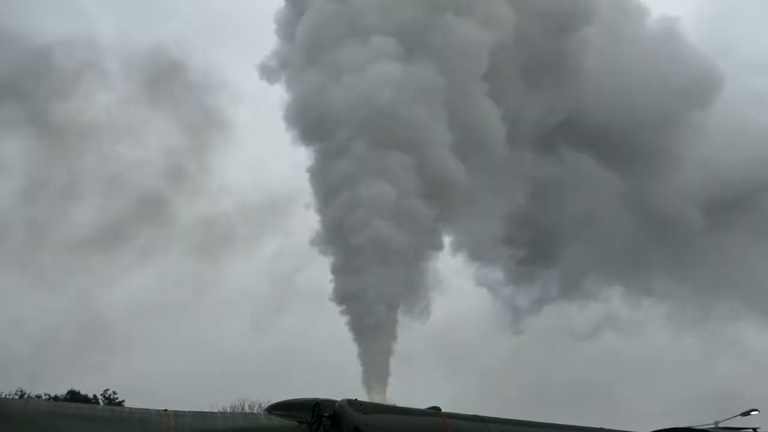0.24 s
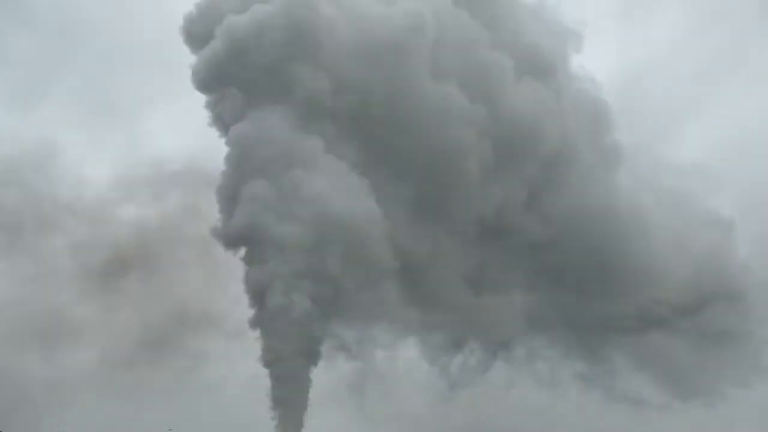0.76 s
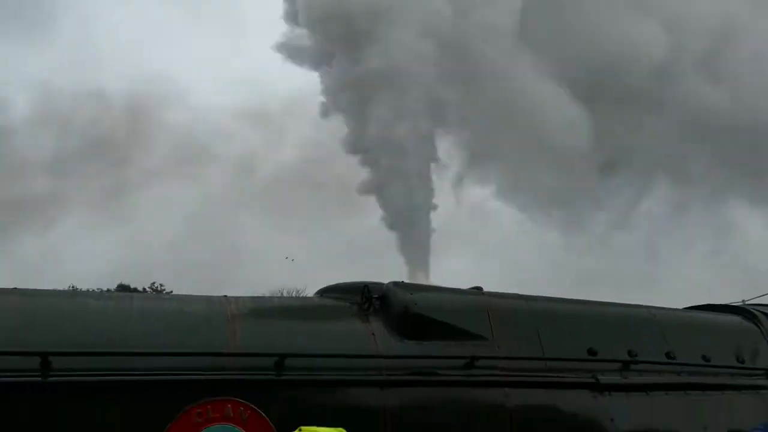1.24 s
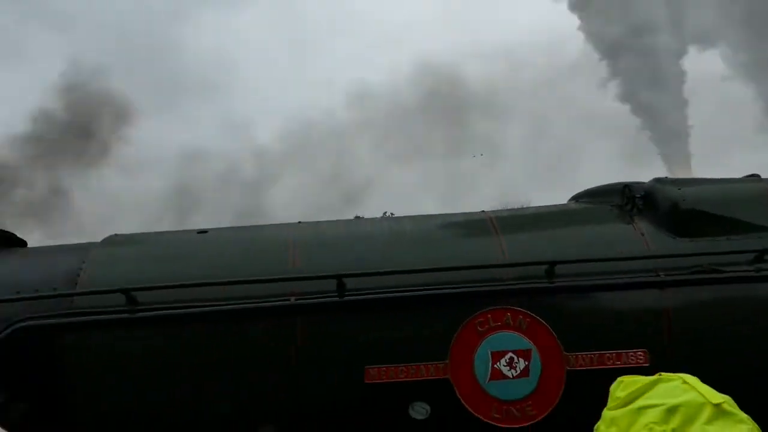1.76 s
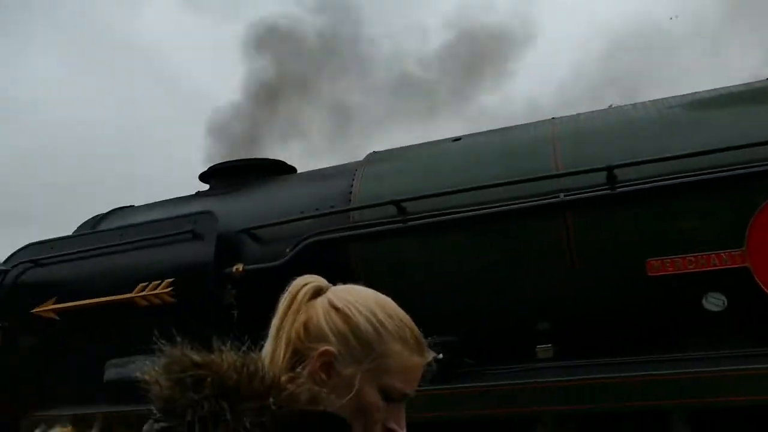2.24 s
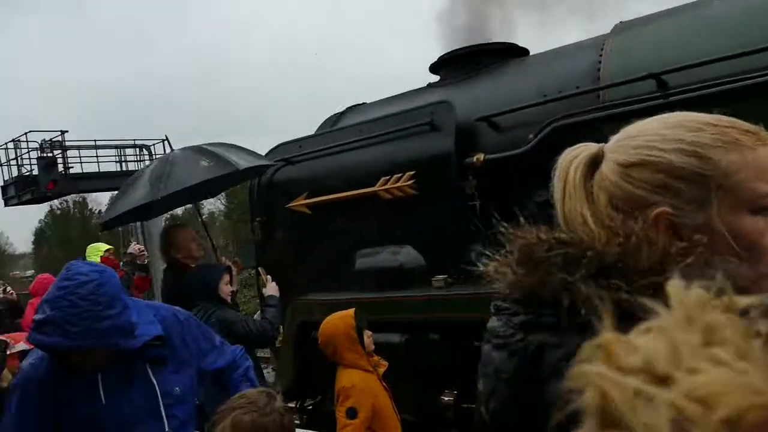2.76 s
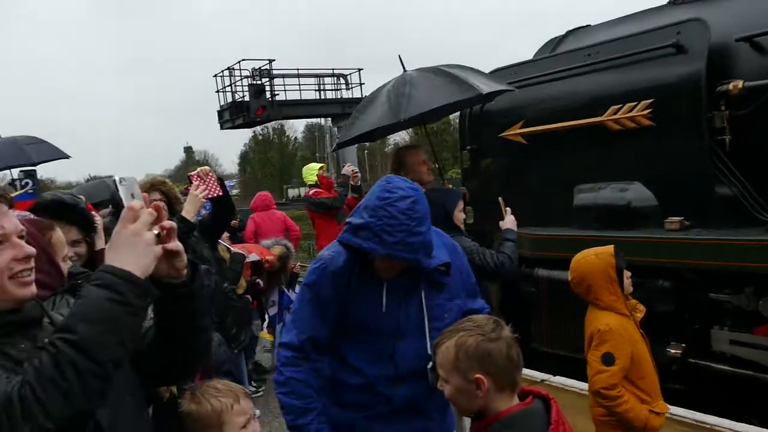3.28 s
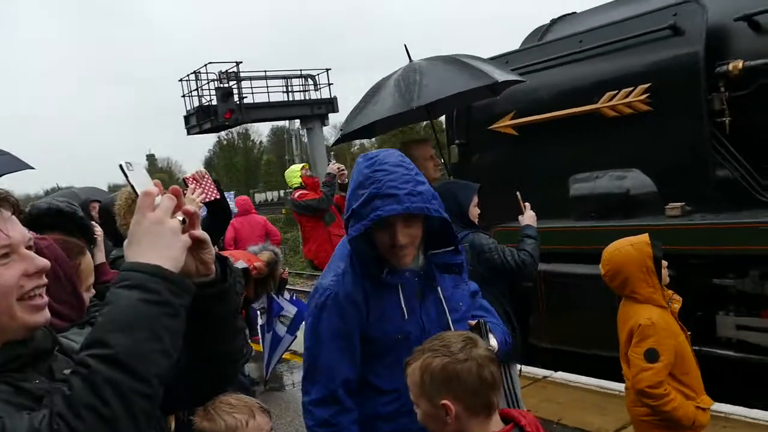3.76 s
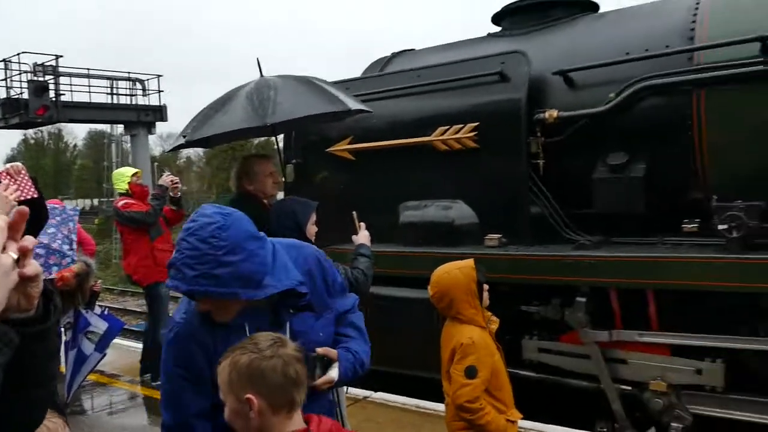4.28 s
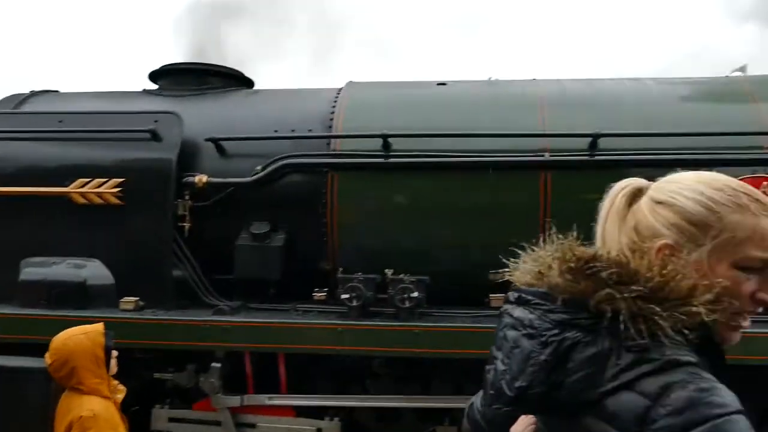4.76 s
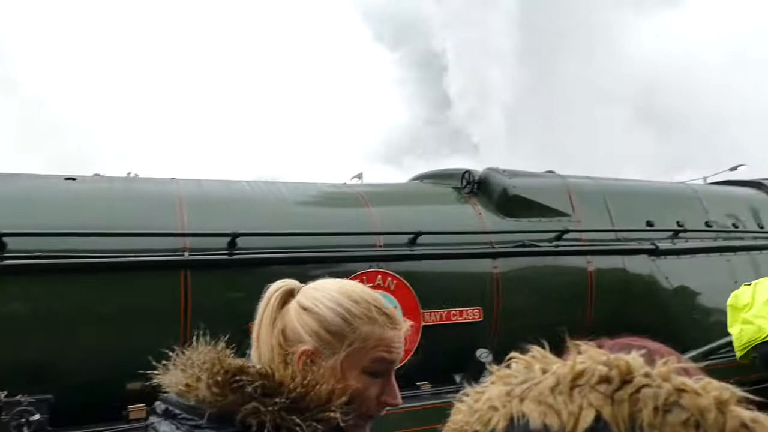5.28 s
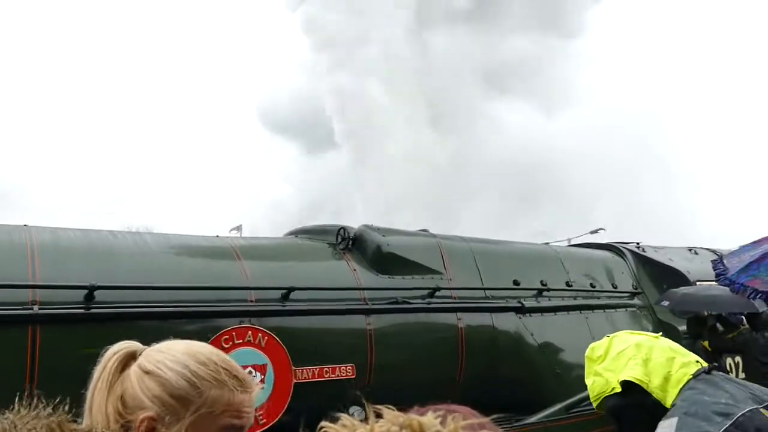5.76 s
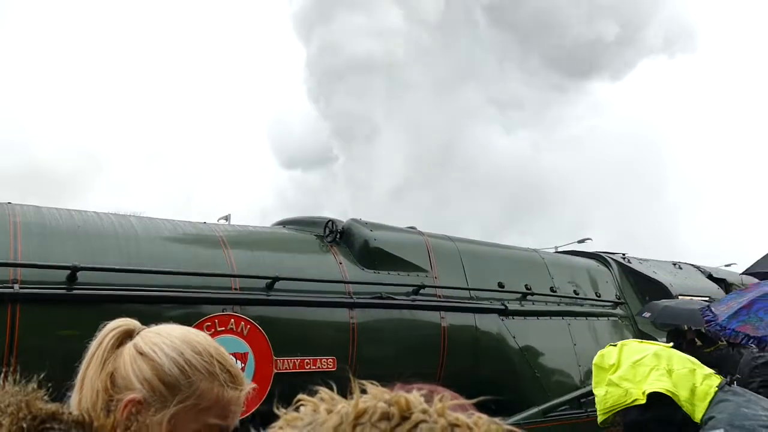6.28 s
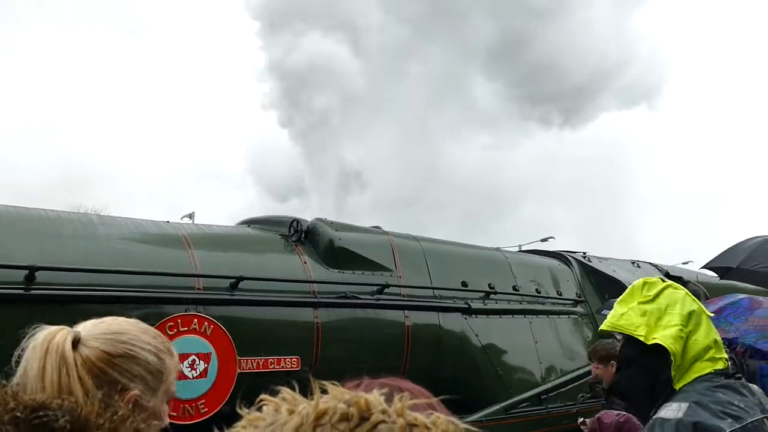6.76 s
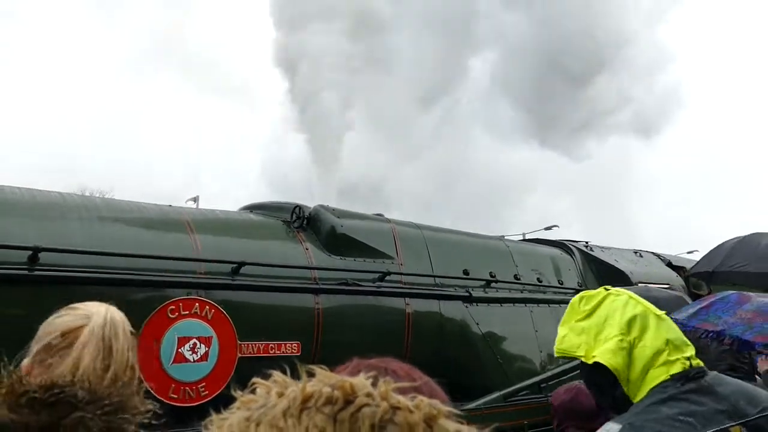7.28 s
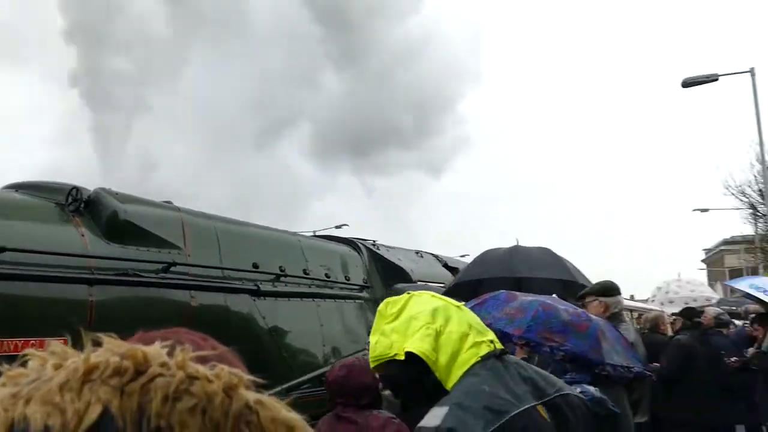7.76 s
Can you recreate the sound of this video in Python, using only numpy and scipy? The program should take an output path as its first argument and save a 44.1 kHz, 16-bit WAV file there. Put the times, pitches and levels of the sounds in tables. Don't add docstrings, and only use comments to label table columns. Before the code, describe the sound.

Continuous rushing steam jet from a locomotive boiler at an open station, unbroken from start to end, with a faint low drone beneath.

```python
import sys
import numpy as np
from scipy import signal
from scipy.io import wavfile
from scipy.ndimage import uniform_filter1d

SR = 44100
rng = np.random.default_rng(int(sys.argv[2]) if len(sys.argv) > 2 else 0)


def generate_wav(sig):
    pcm = np.round(np.clip(np.atleast_2d(sig).T, -1, 1) * 32767).astype(np.int16)
    wavfile.write(sys.argv[1], SR, pcm)


def to_linear_factor(level_db):
    exponent = np.asarray(level_db, float) / 20
    return 10 ** exponent


N = 354123
FRAME = 2048
PORT_HALF_TURN_HZ = 15500


def white_frames():
    hz, s, spectra = signal.stft(rng.standard_normal(N), SR, nperseg=FRAME, noverlap=3 * FRAME // 4)
    return np.maximum(hz, 10)[:, None], s, spectra


def sound_of(spectra):
    return signal.istft(spectra, SR, nperseg=FRAME, noverlap=3 * FRAME // 4)[1][:N]


def in_time(rows, s):
    at_s, *columns = np.transpose(rows)
    return [np.interp(s, at_s, column) for column in columns]


def at_hz(points, hz):
    point_hz, value = np.transpose(points)
    return np.interp(np.log(hz), np.log(point_hz), value)


def patches(shape, bins, frames):
    field = rng.standard_normal(shape)
    for axis, size in ((0, bins), (1, frames), (0, bins), (1, frames)):
        field = uniform_filter1d(field, size, axis=axis)
    return field / field.std()


def turbulence(shape, ripple_db, billow_db, flutter_db):
    ripple = patches(shape, bins=3, frames=30)
    ripple = ripple - uniform_filter1d(ripple, size=17, axis=0)
    billow = patches(shape, bins=90, frames=8)
    flutter = patches(shape, bins=400, frames=3)
    return to_linear_factor(ripple_db * ripple + billow_db * billow + flutter_db * flutter)


def band_rms_one(gain, hz, low_hz, high_hz):
    inside = (hz > low_hz) & (hz < high_hz)
    return gain / np.sqrt(np.mean(gain ** 2 * inside))


def echo(rows, hz, s, boost, dull_hz):
    delay_ms, strength = in_time(rows, s)
    cycles = (hz * delay_ms + .08 * (hz - 3000)) / 1000
    return boost * strength * np.exp(-2j * np.pi * cycles) / (1 + (hz / dull_hz) ** 2)


# start_s [s], delay_ms [ms], strength [0-1]
HAND_ECHO = [(0, .635, .22), (.5, .696, .19), (1, .725, .16), (1.3, .795, .12), (2, .788, .18),
             (2.5, .78, .13), (2.75, .65, .07), (3.25, .58, .17), (4, .572, .27), (4.25, .614, .11),
             (5, .812, .15), (5.25, .807, .2), (6, .716, .23), (6.75, .692, .14), (7, .649, .07),
             (7.25, .524, .21), (7.55, .517, .27), (8.03, .56, .17)]
# start_s [s], delay_ms [ms], strength [0-1]
SHOULDER_ECHO = [
    (0, 1.5, .04),
    (1.5, 1.48, .04),
    (2, 1.47, .12),
    (2.5, 1.38, .07),
    (5.5, 1.33, .04),
    (6, 1.29, .08),
    (7, 1.33, .08),
    (7.5, 1.257, .15),
    (8.03, 1.29, .11),
]
# start_s [s], delay_ms [ms], strength [0-1]
LATE_ECHO = [
    (0, 3.32, .15),
    (.3, 3.32, .02),
    (5.3, 3.88, .03),
    (6.2, 3.8, .08),
    (6.75, 3.725, .22),
    (7, 3.69, .13),
    (7.25, 3.55, .14),
    (7.5, 3.53, .13),
    (8.03, 3.665, .18),
]


def echo_paths(hz, s):
    paths = 1 + echo(LATE_ECHO, hz, s, boost=1.9, dull_hz=5000)
    for rows in (HAND_ECHO, SHOULDER_ECHO):
        paths += echo(rows, hz, s, boost=1.25, dull_hz=9000)
    return paths


# pitch_hz [Hz], share [0-1]
ROAR_REACH = [(400, 0.6), (600, 0)]
MIDDLE_REACH = [(500, 0.22), (700, 1), (1200, 0.46), (1600, 0)]
TOP_REACH = [(7500, 0), (9500, 0.74), (15000, 0.8)]


def aim_tilt_db(hz, s, lean_db, aim):
    roar_db = 1.2 * aim
    skyward = 1 / (1 + np.exp((s - 1.5) / .15))
    middle_db = 2.5 * skyward - 0.29 * abs(lean_db)
    top_db = 3.0 * aim - .3 * abs(lean_db)
    top_db = top_db + .6 * patches((1, len(s)), bins=1, frames=8)
    controls = ((ROAR_REACH, roar_db), (MIDDLE_REACH, middle_db), (TOP_REACH, top_db))
    tilt_db = sum(at_hz(reach, hz) * (db - db.mean()) for reach, db in controls)
    return tilt_db - 0.33 * abs(lean_db) * (hz / PORT_HALF_TURN_HZ) ** 3


# start_s [s], level_db [dB], left-right lean_db [dB], aim at the valve [-1.2..0.5]
JET = [(0, -24.5, -1, -0.4), (.2, -25, -.8, -1.2), (.55, -24, 1.5, -.6), (1, -23.5, 0.8, -0.75),
       (1.22, -24.5, -.5, -1.2), (1.5, -23.5, -3, 0.25), (2, -24, -3, 0.27), (2.3, -25.2, -4.3, -0.1),
       (2.75, -26, -5, -0.19), (3.6, -26, -5.2, -0.046), (4.35, -26.5, -5.4, -0.16),
       (4.7, -25, -4, -0.0097), (5.22, -24, -.5, 0.14), (5.36, -26, -.6, 0.2), (5.85, -25, 0.6, -0.12),
       (6.8, -25, -0.5, .5), (7.4, -26.5, 1, 0.26), (8.03, -24.5, 2, 0.36)]
# pitch_hz [Hz], level_db [dB per Hz]
JET_COLOUR = [(20, -30), (45, -16.5), (95, -9), (140, -2), (300, -2.5), (600, -4), (1000, -2), (1500, -0.5),
              (4000, 0), (8000, -1.5), (9800, 3), (12000, -2.5), (14500, -9.5), (15700, -18)]
# pitch_hz [Hz], share [ratio]
PAN_REACH = [(900, 0), (2000, 1.28), (12000, 0.67), (16000, 1.6)]


def jet():
    hz, s, spectra = white_frames()
    hiss_db, lean_db, aim = in_time(JET, s)
    colour = band_rms_one(to_linear_factor(at_hz(JET_COLOUR, hz)), hz, 1400, 8000)
    level = to_linear_factor(hiss_db + aim_tilt_db(hz, s, lean_db, aim))
    mid = spectra * colour * level * echo_paths(hz, s)
    mid *= turbulence(spectra.shape, ripple_db=1.7, billow_db=.45, flutter_db=.45)
    lean = (to_linear_factor(lean_db) - 1) / (to_linear_factor(lean_db) + 1)
    turn = np.exp(1j * np.pi * (hz / PORT_HALF_TURN_HZ) ** 5.7)
    return sound_of(mid), sound_of(mid * lean * at_hz(PAN_REACH, hz) * turn)


# start_s [s], level_db [dB]
SCATTER = [(0, -2), (.25, -2), (1, 0), (1.3, -2), (2.1, 1.5), (2.5, 0.5), (3.6, 2.5), (4.35, -2.5), (5, 3),
           (5.75, -1), (6.1, 1), (7, 1.5), (7.4, -3), (7.7, -1.5), (8.03, 3)]
# pitch_hz [Hz], level_db [dB per Hz]
WASH_COLOUR = [(20, -26), (45, -21), (110, -8), (400, -0.5), (800, 0), (1300, -4.5), (2200, -9.5),
               (3500, -11), (8000, -12.5), (9800, -8.5), (12000, -9.5), (14500, -13.5), (15700, -23)]
# pitch_hz [Hz], share [0-1]
BRIGHT_REACH = [(1200, 0.24), (2500, 1)]


def wash():
    hz, s, spectra = white_frames()
    hiss_db, lean_db, _ = in_time(JET, s)
    swell_db = 0.5 * patches((1, len(s)), bins=1, frames=20)
    rise_db = 0.37 * abs(lean_db) + swell_db + in_time(SCATTER, s)[0]
    level_db = -32.5 + .3 * (hiss_db - hiss_db.mean()) + rise_db
    colour = band_rms_one(to_linear_factor(at_hz(WASH_COLOUR, hz)), hz, 250, 1200)
    tilt_db = at_hz(BRIGHT_REACH, hz) * -0.5 * (rise_db - rise_db.mean())
    unrest = turbulence(spectra.shape, ripple_db=1.2, billow_db=.4, flutter_db=.35)
    return sound_of(spectra * colour * to_linear_factor(level_db + tilt_db) * unrest)


def drone():
    hum_hz, width_hz, level_db = 124, 9, -50.5
    radius = np.exp(-np.pi * width_hz / SR)
    angle = 2 * np.pi * hum_hz / SR
    resonance = [1, -2 * radius * np.cos(angle), radius * radius]
    hum = signal.lfilter([1, 0, -1], resonance, rng.standard_normal(N))
    return to_linear_factor(level_db) * hum / hum.std()


def scene():
    mid, lean = jet()
    mid, side = mid + drone(), lean + wash()
    return np.array([mid + side, mid - side])


def band_limit(x):
    return signal.sosfilt(signal.butter(12, 15700, fs=SR, output="sos"), x)


# pitch_hz [Hz], width_hz [Hz], depth_db [dB]
NOTCHES = [
    (573, 88, -12.5),
    (2675, 175, -24),
]


def record(dry):
    for hz, width_hz, depth_db in NOTCHES:
        middle = -2 * np.cos(2 * np.pi * hz / SR)
        wide = np.pi * width_hz / SR
        left_over = wide * to_linear_factor(depth_db)
        dry = signal.lfilter([1 + left_over, middle, 1 - left_over], [1 + wide, middle, 1 - wide], dry)
    mix = signal.sosfilt(signal.butter(1, 84, "high", fs=SR, output="sos"), dry)
    return band_limit(mix)


dry = scene()
out = record(dry)
generate_wav(out)
```